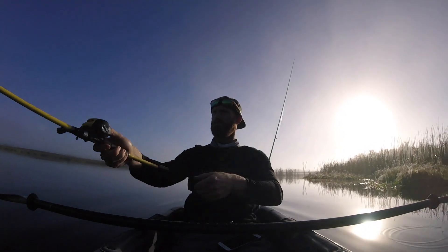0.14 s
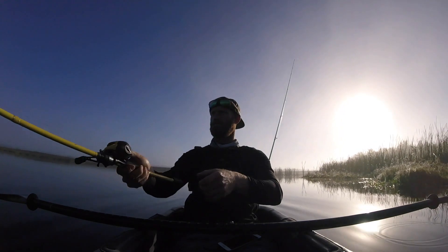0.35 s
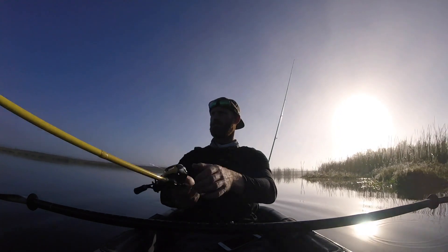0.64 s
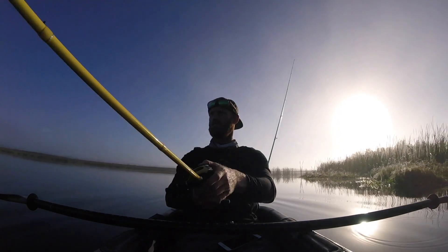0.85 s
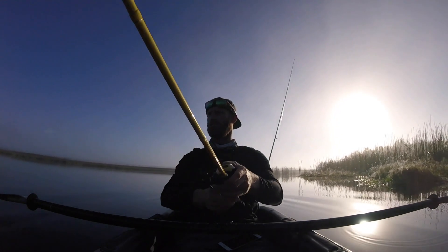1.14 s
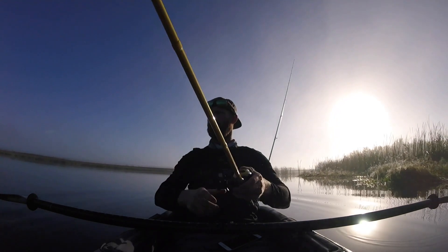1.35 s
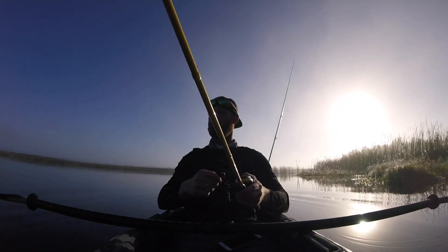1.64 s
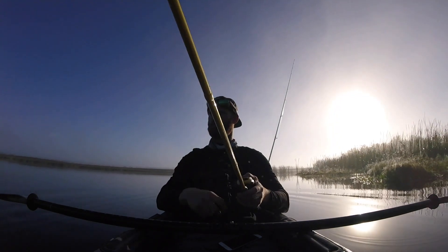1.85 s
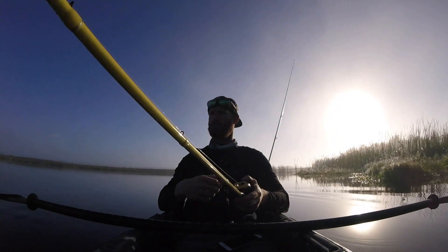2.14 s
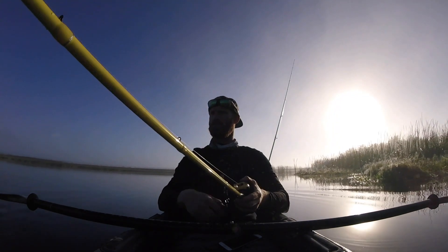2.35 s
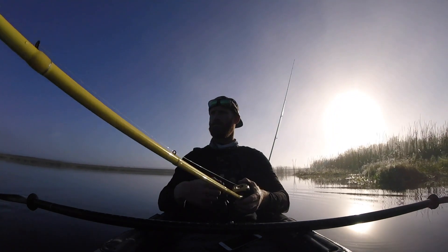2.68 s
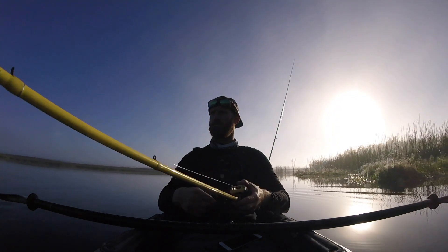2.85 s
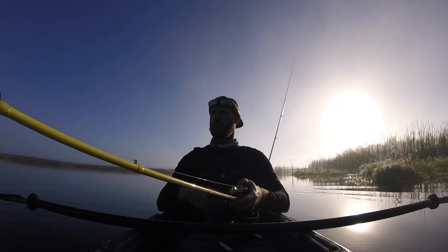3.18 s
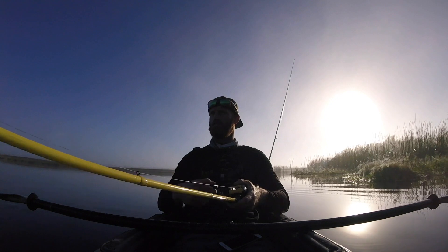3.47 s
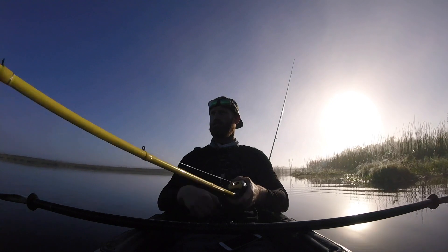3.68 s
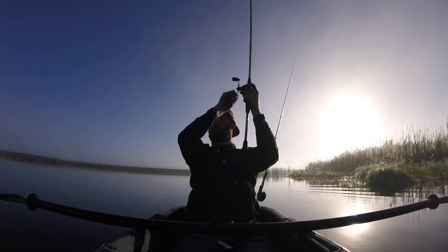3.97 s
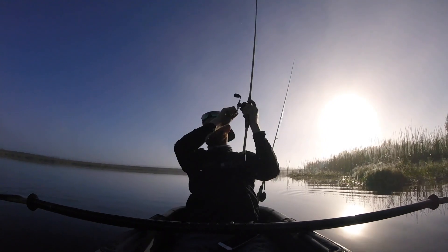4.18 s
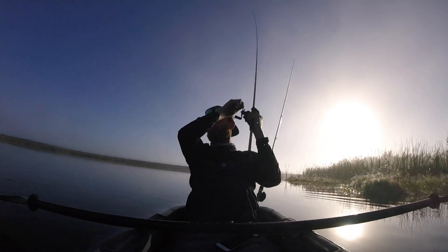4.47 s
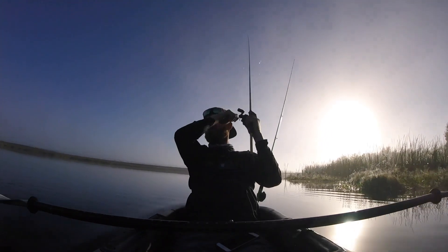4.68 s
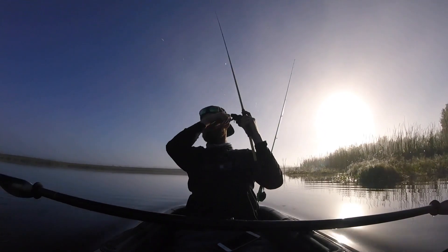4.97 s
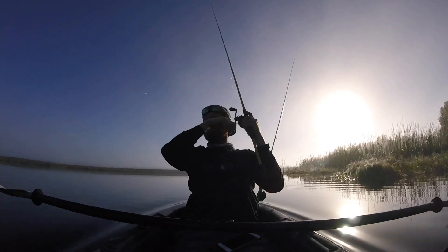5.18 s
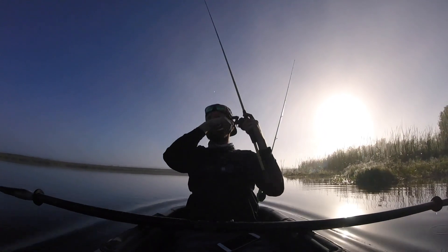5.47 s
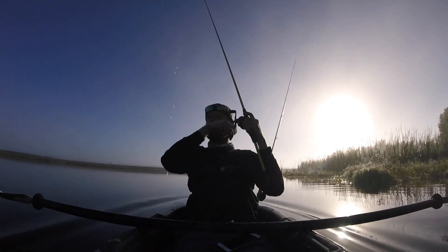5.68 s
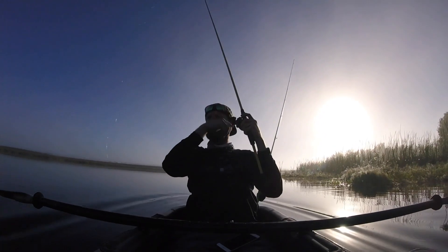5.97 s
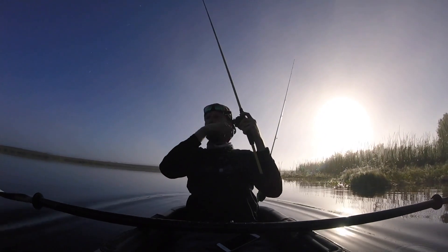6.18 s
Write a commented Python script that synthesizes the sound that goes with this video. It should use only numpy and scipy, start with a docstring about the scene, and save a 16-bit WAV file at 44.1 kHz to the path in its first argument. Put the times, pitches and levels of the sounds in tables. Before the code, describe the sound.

A few light ticks and one sharp metallic click come from a fishing reel near the microphone on a plastic kayak. After a pause, a cast brings a short rattle, a thin rod swish and a heavy hull thump with dull seat rubbing, trailing off in smaller bumps. Behind it all, across open, echoless marsh water, a low motor hum gradually grows beneath a faint insect drone and tiny bird calls.

```python
"""An angler's cast from a plastic kayak on a still marsh pond, close to a microphone on the bow.
The reel ticks and snaps into gear, tackle rattles, the rod whistles, and the hull thumps as the seat scrubs.
Far off, a motor hums and slowly swells, and a thin whine comes and goes.
Insects shrill in the reeds with their wing strokes and small birds chip. Open water gives no echo."""
import sys
import numpy as np
from scipy import signal
from scipy.fft import rfft, irfft, next_fast_len
from scipy.io import wavfile
from scipy.ndimage import uniform_filter1d, minimum_filter1d

SR = 44100
rng = np.random.default_rng(int(sys.argv[2]) if len(sys.argv) > 2 else 0)


def dump_mix(stems):
    """Bounce the given channels to the path in sys.argv[1] as a 16-bit WAV at rate SR."""
    frames = np.atleast_2d(stems).T  # one column per channel
    limited = np.clip(frames, -1, 1)  # hard clip at full scale
    pcm = np.round(limited * 32767).astype(np.int16)
    wavfile.write(sys.argv[1], SR, pcm)


N = 278712
TIME = np.arange(N) / SR


# blows on the hull: t/s, peak level/dB, contact time/s
HULL_BLOWS = [(4.0072, -16.5, .0021), (4.036, -22, .006), (4.082, -29, 0.0082), (4.151, -16, .003),
              (4.1574, -4, .0036), (4.19, -19.5, 0.013), (4.224, -17, 0.0086), (4.345, -26.5, .012),
              (4.515, -19.5, .022), (4.84, -22.5, 0.0216), (5.312, -19.5, .017), (5.456, -15, 0.017),
              (5.69, -28.5, .028)]
# modes of the plastic hull: f/Hz, level/dB, t60/s
HULL_MODES = [(35.7, -24, 0.84), (48.3, -13, 0.26), (80, -20.5, 0.11), (121, -5.5, 0.13), (173, -5, 0.048),
              (236.5, 1, 0.058), (309, 0.5, 0.075), (475, -26, 0.039)]

def hull(flex=.13):
    """Right under the microphone, blows flex the deck and ring the hull; long pushes wake only low modes."""
    out, body = np.zeros(N), ring(HULL_MODES)
    for start, db, contact in HULL_BLOWS:
        push = np.hanning(int(contact * SR))
        blow = unit_peak(signal.fftconvolve(body, push))
        blow[:len(push)] += flex * push
        add(out, start, undb(db) * unit_peak(blow))
    return out


# modes of the reel body: f/Hz, level/dB, t60/s
REEL_MODES = [(754, -15, .04), (2007, -9, .04), (2716, -2, .025), (2947, -11, .028), (3246, -14, .03),
              (3577, -7, .022), (4039, -11, .025), (4721, -14, .03), (5332, -11, .028), (5806, -10, .03),
              (6075, -6, .03), (6262, 0, .028), (7400, -18, .035)]
# gear teeth chattering as the clutch latches: t/s, level/dB, t60/s
GEAR_CHATTER = [(1.5825, -25, 0.01), (1.5853, -13, 0.018), (1.5862, -19, 0.011), (1.591, -34, 0.051),
                (1.6, -43.5, .14)]
# spectrum of the snap: f/Hz, level/dB
SNAP_SPECTRUM = [(500, -31), (780, -12), (1200, -13), (1700, -14), (2050, -1), (2600, 5.5), (3200, -3),
                 (3800, 0), (4800, -8), (6300, 1), (7500, -5), (8200, -23), (10600, -14.5), (13000, -52)]
# light ticks: t/s, level/dB, tilt/(dB/octave)
REEL_TICKS = [(1.2894, -40.5, 4), (1.4662, -48, 0), (1.5046, -46.5, -1), (1.556, -41, -2),
              (3.78, -48.5, -8), (4.5512, -39.5, -6), (4.619, -49, -5), (4.66, -49, -8), (4.8026, -37, 2),
              (5.2141, -41.5, -8), (5.365, -43, -7), (5.495, -47, 2), (5.528, -45, -5), (5.7275, -45.5, -5),
              (5.846, -42.5, -3)]
# spectrum of a tick: f/Hz, level/dB
TICK_SPECTRUM = [(1200, -14), (2000, -11), (2600, -1), (3800, -3.5), (5000, -11), (6250, 4), (7100, -23),
                 (10000, -35), (13000, -47)]

def reel(latch_s=1.5852, impact_db=-16, ring_db=-13, tick_boost_db=2, tick_t60_s=.018):
    """Close by, the clutch snaps home and rings the reel as its teeth chatter; parts tick in the hand."""
    out = np.zeros(N)
    impact = unit_peak(colour(signal.unit_impulse(SR // 2), SNAP_SPECTRUM))
    body = unit_peak(ring(REEL_MODES))
    add(out, latch_s, undb(impact_db) * impact + undb(ring_db) * body)
    for start, db, t60 in GEAR_CHATTER:
        add(out, start, undb(db) * burst(t60, SNAP_SPECTRUM))
    for start, db, slope in REEL_TICKS:
        add(out, start, undb(db + tick_boost_db) * burst(tick_t60_s, tilt(TICK_SPECTRUM, slope)))
    return out


# rattles through the cast: t/s, level/dB, t60/s, tilt/(dB/octave)
TACKLE_RATTLES = [(3.869, -45, .063, -1.5), (3.8863, -38, .047, -1.5), (3.9378, -30, 0.022, 2),
                  (3.99, -50, .27, 1), (4.0807, -40, 0.064, -4), (4.104, -29, .075, 0.5),
                  (4.1255, -29.5, 0.06, 0), (4.149, -41, .09, -5.5)]
# spectrum of a rattle: f/Hz, level/dB
TACKLE_SPECTRUM = [(700, -8), (1400, 2), (2400, 6), (3200, 1), (4300, 5.5), (5200, 0.5), (6200, 6.5),
                   (7400, -6), (9500, -15), (11000, -14), (13500, -34)]

def tackle(grain_db=3):
    """Near the microphone, the tackle rattles in grainy sprays of tiny contacts."""
    out = np.zeros(N)
    for start, db, t60, slope in TACKLE_RATTLES:
        add(out, start, undb(db) * burst(t60, tilt(TACKLE_SPECTRUM, slope)))
    return out * undb(grain_db * walk(600))


def rod_whip(peak_s=4.1245, fast_hz=6000, slow_hz=4250, drop_s=.0015, width_hz=380):
    """Over the boat, the rod sheds eddies: a noisy whistle whose pitch falls as the tip slows."""
    slowed = (1 + np.tanh((TIME - peak_s) / drop_s)) / 2
    hz = fast_hz + (slow_hz - fast_hz) * slowed
    eddies = noise([(20, 0), (width_hz, 0), (3000, -22)])
    return swell(peak_s, db=-40, rise_s=.024, fall_s=.016) * eddies * tone(hz)


# the angler's weight shifts: t/s, level/dB, rise/s, fall/s
WEIGHT_SHIFTS = [(3.87, -44, 0.18, .5), (4.015, -30, 0.0058, .1), (4.154, -27, 0.12, 0.1336),
                 (4.52, -44, 0.04, 0.4)]
# spectrum of the scrub: f/Hz, level/dB
SCRUB_SPECTRUM = [(20, -21), (50, 0), (110, 3.5), (200, 0.5), (300, 1.5), (420, -7.5), (620, -12.5),
                  (900, -25.5), (2000, -35.5)]

def seat():
    """Just aft of the microphone, the seat scrubs dully against the hull as the angler shifts."""
    scrub = np.max([swell(*shift) for shift in WEIGHT_SHIFTS], axis=0)
    return scrub * noise(SCRUB_SPECTRUM)


# multiples of the engine's cycle rate, from the first up: level/dB
ENGINE_ORDERS = [-16, -21, -13.5, -25, 1.56, -18.5, -12.5, -7.5, -25, -5.5, -11, -14, -5, -29, -16, -17,
                 -28, -14, -28, -28.5, -27, -34, -26.5]
# spectrum of its rumble: f/Hz, level/dB
RUMBLE_SPECTRUM = [(18, -5), (30, -3), (55, 4), (90, 0), (160, -10.5), (240, -7), (330, -9.5), (450, -22),
                   (700, -36.5)]

def motor(cycle_hz=19.235, sag_hz_per_s=.029, start_db=-52, rise_db_per_s=2.2, rumble_db=-6):
    """Far across the water, an engine hums and rumbles as it nears; the air path makes each order waver."""
    phase = 2 * np.pi * np.cumsum(cycle_hz - sag_hz_per_s * TIME) / SR
    hum_db = start_db + rise_db_per_s * TIME
    # as it nears, the upper orders gain on the strongest one
    db_per_octave = .3 * (TIME - TIME.mean())
    strongest = 1 + np.argmax(ENGINE_ORDERS)
    hum = np.zeros(N)
    for order, db in enumerate(ENGINE_ORDERS, 1):
        gain = undb(db + db_per_octave * np.log2(order / strongest) + 1.1 * walk(6))
        phase_drift = 2 * np.pi * rng.random() + .08 * walk(5)
        hum += gain * np.sin(order * phase + phase_drift)
    # the deep rumble carries far, so it swells less than the hum
    deep_db = hum_db.mean() + .8 * (hum_db - hum_db.mean()) + rumble_db
    return undb(hum_db) * unit(hum) + undb(deep_db) * noise(RUMBLE_SPECTRUM)


# spectrum of the motor's rush: f/Hz, level/dB
RUSH_SPECTRUM = [(220, -31.5), (380, -4.5), (431, -0.5), (586, -3.5), (652, 0), (1090, -6.5), (1660, -15),
                 (2460, -23), (3800, -28.5), (4940, -56), (8360, -120)]
# spectrum of its bright edge: f/Hz, level/dB
EDGE_SPECTRUM = [(1100, -16), (1450, 1.5), (1800, -2), (2200, -7.5), (2800, -14.5)]

def motor_rush(start_db=-69.7, rise_db_per_s=3, wash_db=-61.2, edge_db=-8.3, flutter_db=.6):
    """The motor's rush climbs out of a distant wash and brightens as it grows."""
    gain = np.hypot(undb(wash_db), undb(start_db + rise_db_per_s * TIME))
    rush = noise(RUSH_SPECTRUM)
    edge = undb(edge_db) * gain / gain.max() * noise(EDGE_SPECTRUM)
    return gain * undb(flutter_db * walk(13)) * (rush + edge)


# crests of the whine: t/s, level/dB
WHINE_CRESTS = [(.3, -67.5), (1.8, -63.3)]

def whine(pitch_hz=629, fade_db_per_s=13.5, waver_hz=3.27, waver_db=2):
    """In the distance, a thin, unsteady tone swells twice and fades away."""
    db = np.max([crest_db - fade_db_per_s * np.abs(TIME - at) for at, crest_db in WHINE_CRESTS], axis=0)
    return undb(db + waver_db * walk(8.3)) * tone(pitch_hz + waver_hz * walk(15))


# insect choirs: f/Hz, bandwidth/Hz, relative level/dB, wing stroke rate/Hz
INSECT_CHOIRS = [(4866, 324, -1.5, 65), (5070, 270, -5.5, 110), (6227, 320, -3.5, 180)]

def insects(level_db=-68.6, crest_s=.36, surge_hz=3.036, slowing_hz_per_s=.046, surge_db=1.65, follow=.32):
    """Off in the reeds, each choir's wing strokes excite a narrow resonance; the choirs surge in step."""
    t = TIME - crest_s
    surge = np.cos(2 * np.pi * (surge_hz - slowing_hz_per_s * t / 2) * t)
    bin_hz = np.fft.rfftfreq(N, 1 / SR)
    out = np.zeros(N)
    for k, (hz, width_hz, db, stroke_hz) in enumerate(INSECT_CHOIRS):
        stroke_phase = 2 * np.pi * np.cumsum(stroke_hz * (1 + .08 * walk(9))) / SR
        strokes = (1 + .22 * np.cos(stroke_phase)) * rng.standard_normal(N)
        resonance = 1 / (1 + 2 * ((bin_hz - hz) / width_hz) ** 2)
        song = unit(irfft(rfft(strokes) * resonance, N))
        depth_db = surge_db * follow ** (k / 2)  # higher choirs surge less
        out += undb(db + depth_db * surge + .5 * walk(12)) * song
    return undb(level_db) * out


# bird notes: t/s, length/s, start f/Hz, end f/Hz, level/dB, swell over the note/dB
BIRD_NOTES = [(1.74, 0.054, 2830, 2760, -77, -2), (1.944, .03, 5930, 7300, -66, 3),
              (2.225, .05, 7200, 7600, -74, 3), (3.49, .083, 4080, 4030, -77, 0),
              (5.54, .05, 3050, 2650, -71, -4), (5.732, 0.34, 4250, 4210, -69, 7),
              (6.159, 0.016, 6540, 5500, -62, 0), (6.194, .14, 5130, 4960, -66, -6),
              (6.27, .032, 6400, 7200, -68, -2)]

def birds(glide_power=2.1):
    """Far out in the marsh, thin whistles glide fast at first and settle on their end pitch."""
    out = np.zeros(N)
    for start, length, start_hz, end_hz, db, swell_db in BIRD_NOTES:
        progress = np.linspace(0, 1, int(length * SR))
        hz = end_hz + (start_hz - end_hz) * (1 - progress) ** glide_power
        envelope = undb(db + swell_db * (progress - .5)) * signal.windows.tukey(len(progress), .3)
        add(out, start, envelope * tone(hz))
    return out


# spectrum of the air's hiss: f/Hz, level/dB
AIR_SPECTRUM = [(1500, -6.5), (3000, -1.5), (4000, -5.5), (5600, -2.5), (7000, 3), (8500, 0), (10000, -8.5),
                (12000, -5.5), (13700, -28)]

def air(level_db=-70.5):
    """A smooth, high hiss lies over the pond, behind everything else."""
    return undb(level_db) * noise(AIR_SPECTRUM)


def undb(db):
    """Decibels to gain."""
    return 10 ** (np.asarray(db) / 20)


def unit(x):
    """Scale to rms 1."""
    return x / np.sqrt(np.mean(x ** 2))


def unit_peak(x):
    """Scale to peak 1."""
    return x / np.abs(x).max()


def tone(hz):
    """A sine of rms 1 that follows a pitch curve."""
    return np.sqrt(2) * np.sin(2 * np.pi * np.cumsum(hz) / SR)


def walk(rate_hz):
    """Smooth random drift with a spread near 1."""
    hold = int(SR / rate_hz)
    steps = np.repeat(rng.standard_normal(N // hold + 1), hold)
    return 1.3 * uniform_filter1d(uniform_filter1d(steps, hold), hold)[:N]


def colour(x, spectrum):
    """Causal filter through (f/Hz, level/dB) points, falling away beyond both ends."""
    size = next_fast_len(len(x) + 4096, True) // 2 * 2
    hz, db = np.transpose(spectrum)
    octave = np.log2(np.maximum(np.fft.rfftfreq(size, 1 / SR), 1))
    outside = np.maximum(np.log2(hz[0]) - octave, 0) + np.maximum(octave - np.log2(hz[-1]), 0)
    gain_db = np.interp(octave, np.log2(hz), db) - np.minimum(24 * outside, 50)
    # folding the cepstrum gives minimum phase: nothing sounds ahead of a hit
    cepstrum = irfft(np.log(undb(gain_db)))
    cepstrum[1:size // 2] *= 2
    cepstrum[size // 2 + 1:] = 0
    return irfft(rfft(x, size) * np.exp(rfft(cepstrum)))[:len(x)]


def tilt(spectrum, db_per_octave):
    """Tip a spectrum about 4 kHz: harder contacts are brighter."""
    return [(hz, db + db_per_octave * np.log2(hz / 4000)) for hz, db in spectrum]


def noise(spectrum):
    """Coloured noise of rms 1."""
    return unit(colour(rng.standard_normal(N), spectrum))


def fade(t60):
    """Half a second of exponential decay."""
    return np.exp(-np.log(1000) * TIME[:SR // 2] / t60)


def ring(modes):
    """Impulse response of a set of modes."""
    return sum(undb(db) * fade(t60) * np.sin(2 * np.pi * hz * TIME[:SR // 2]) for hz, db, t60 in modes)


def burst(t60, spectrum):
    """A dying spray of tiny contacts, peak near 1."""
    spray = colour(fade(t60) * rng.standard_normal(SR // 2), spectrum)
    return spray / np.sqrt(np.sum(spray ** 2) / (t60 * SR / 60))


def swell(peak_s, db, rise_s, fall_s):
    """Gain that peaks at peak_s and is 20 dB down rise_s before and fall_s after."""
    t = TIME - peak_s
    return undb(db - 20 * np.maximum(-t / rise_s, t / fall_s))


def add(out, start_s, x):
    """Mix a sound in at start_s."""
    i = int(start_s * SR)
    out[i:i + len(x)] += x[:N - i]


def limiter(x, ceiling_db=-9.3, lookahead_s=.005, recovery_db_per_s=1):
    """A peak over the ceiling turns everything down at once; the gain then creeps back."""
    level_db = 20 * np.log10(np.abs(x).max(axis=0) + 1e-9)
    over_db = np.maximum(level_db - ceiling_db, 0)
    recovered_db = recovery_db_per_s * TIME
    gain_db = recovered_db - np.maximum.accumulate(over_db + recovered_db)
    size = int(lookahead_s * SR)
    return x * undb(uniform_filter1d(minimum_filter1d(gain_db, size), size))


def scene():
    """The far marsh and the close kayak meet at one microphone on the bow."""
    marsh = motor() + motor_rush() + whine() + insects() + air() + birds()
    kayak = reel() + tackle() + rod_whip() + seat() + hull()
    return (kayak + marsh)[None]


def record(dry, low_cut_hz=18, top_hz=13700):
    """The bow camera drops the deepest bass, ducks after the hardest thump and cuts the top."""
    low_cut = signal.butter(2, low_cut_hz, "high", fs=SR, output="sos")
    high_cut = signal.ellip(8, .2, 70, top_hz, fs=SR, output="sos")
    limited = limiter(signal.sosfilt(low_cut, dry))
    return signal.sosfilt(high_cut, limited)


dry = scene()
out = record(dry)
dump_mix(out)
```